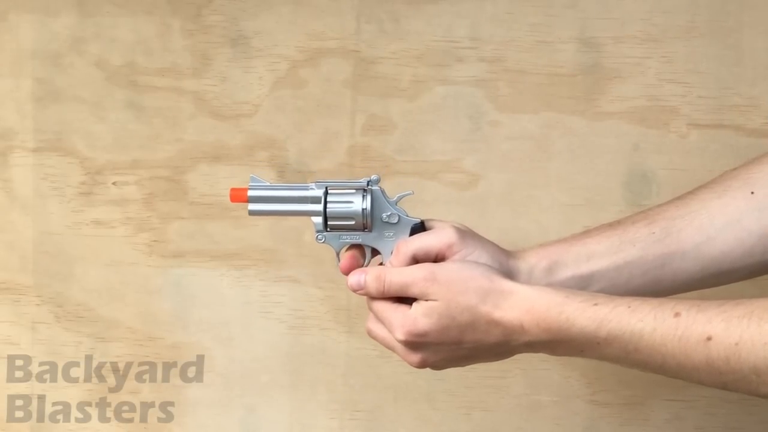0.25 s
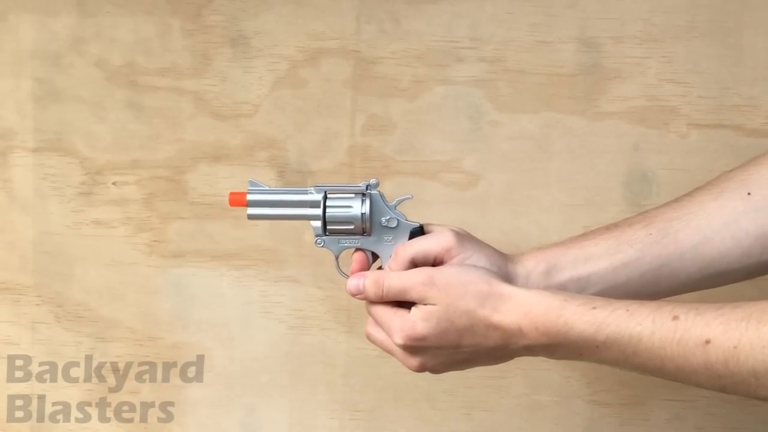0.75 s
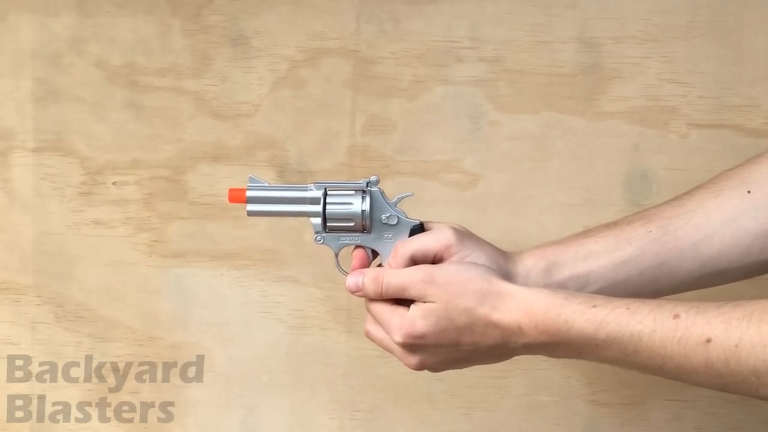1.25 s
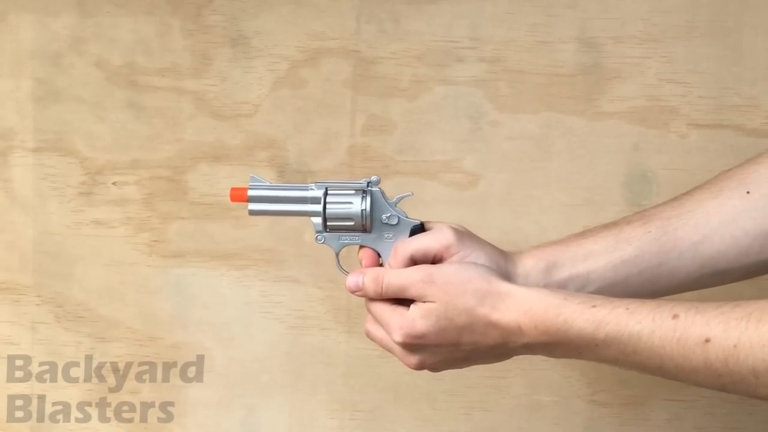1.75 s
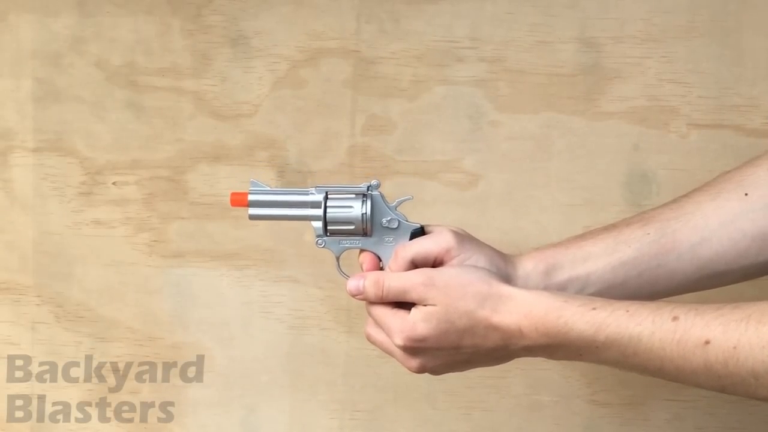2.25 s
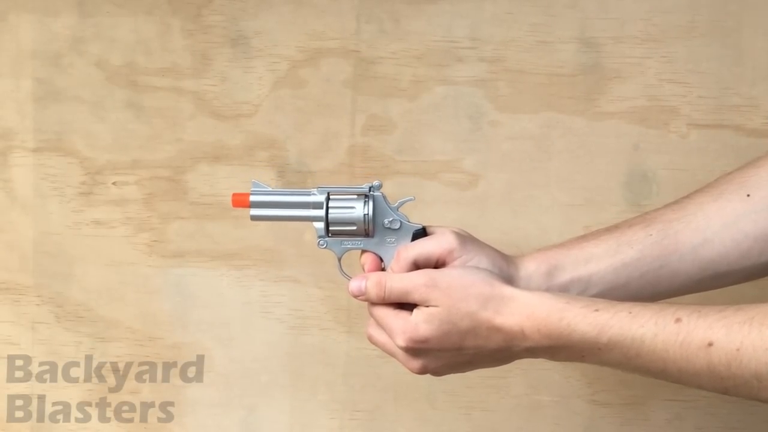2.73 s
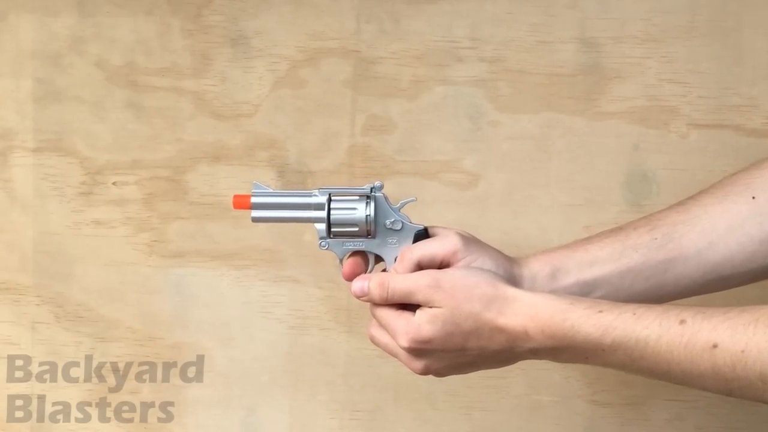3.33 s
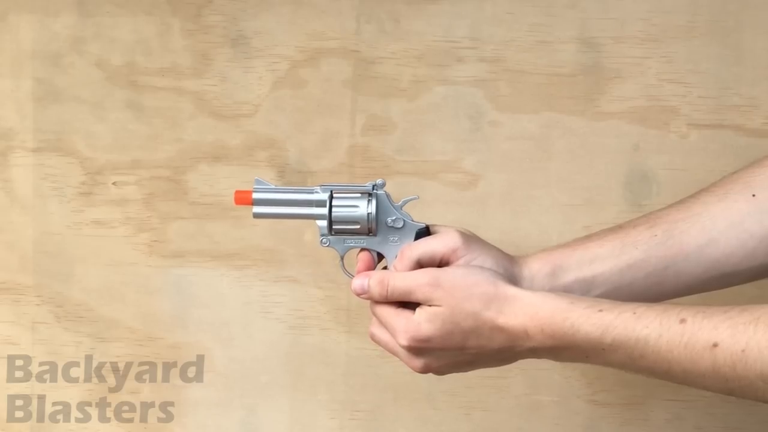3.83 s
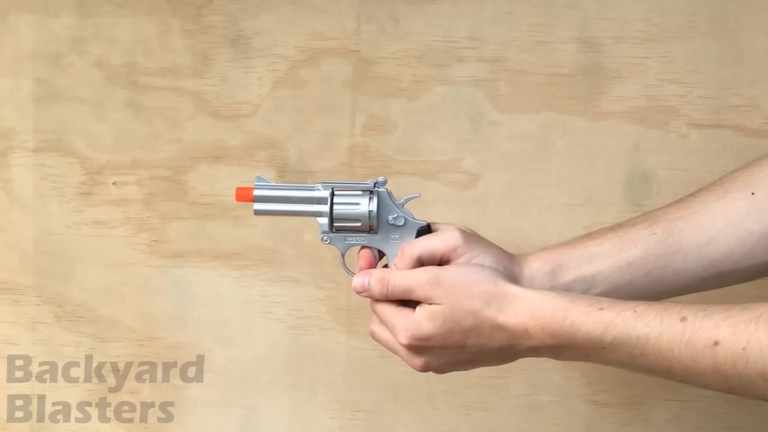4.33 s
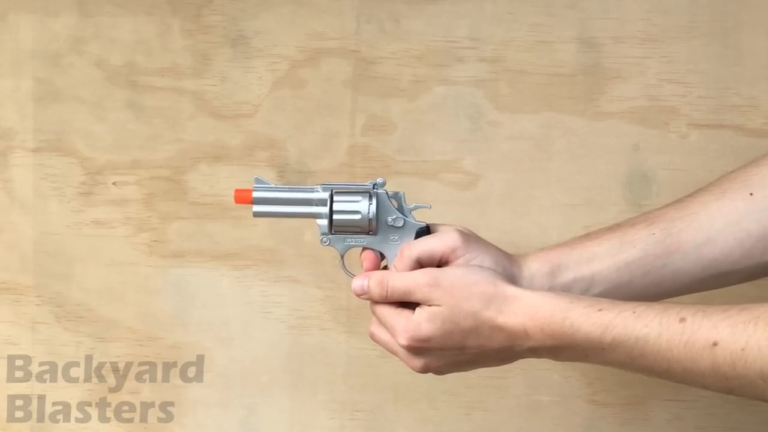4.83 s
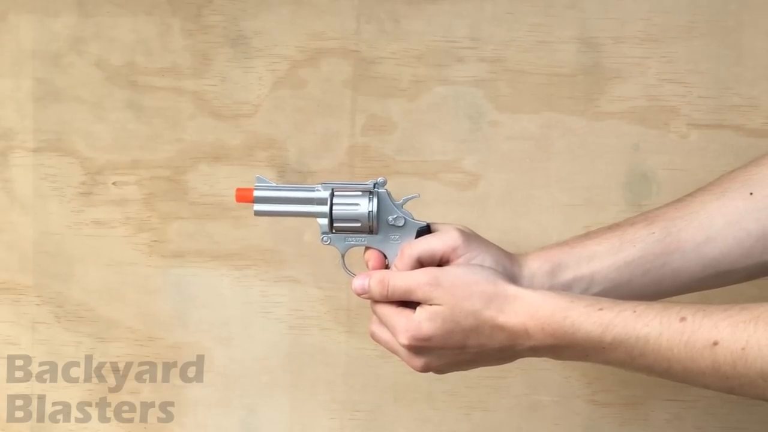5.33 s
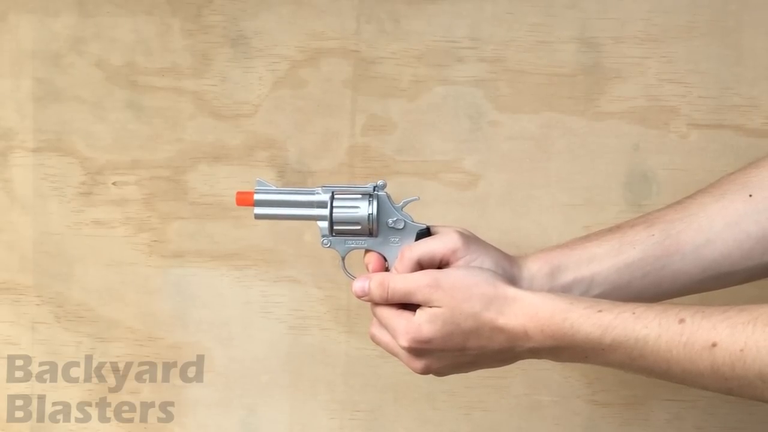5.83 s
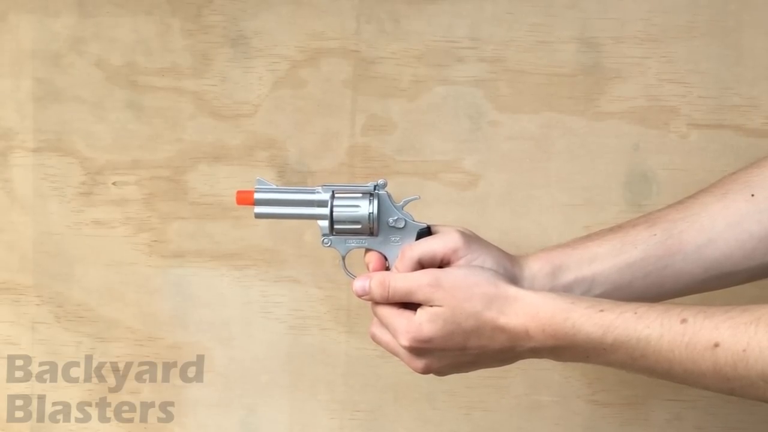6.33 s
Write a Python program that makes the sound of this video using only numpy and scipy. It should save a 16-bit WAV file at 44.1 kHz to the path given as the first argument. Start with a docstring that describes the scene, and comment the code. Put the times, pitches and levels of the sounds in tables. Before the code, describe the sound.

Close by in a quiet yard, a metal toy revolver clicks and lightly rattles as its lock works, then fires a loud, bright cap bang with a short thump. Reflections and soft hiss follow. After a pause, more clicks lead to a second similar bang. A low motor hum, faint birds and a brief distant hoarse drone lie behind, ducking under each shot.

```python
"""Toy revolver in a quiet yard

A toy revolver is cocked and fired twice, close by. Its lock clicks and rattles: short metal scrapes that leave
the frame ringing. Each cap flares, then cracks, thumps and blasts: shaped noise and a sagging low tone,
followed by reflections. A soft hiss grows after each shot and stops short. Behind it a far motor hums in steady
tones, and birds and a hoarse drone call faintly; this background sinks under each bang."""
import sys
import numpy as np
from scipy import signal
from scipy.fft import rfft, irfft
from scipy.io import wavfile

SR = 44100
rng = np.random.default_rng(int(sys.argv[2]) if len(sys.argv) > 2 else 0)


def dump_mix(stems):
    """Bounce the given channels to the path in sys.argv[1] as a 16-bit WAV at rate SR."""
    frames = np.atleast_2d(stems).T  # one column per channel
    limited = np.clip(frames, -1, 1)  # hard clip at full scale
    pcm = np.round(limited * 32767).astype(np.int16)
    wavfile.write(sys.argv[1], SR, pcm)


N = 289737  # length in samples

# colour of the blast, also used for the hammer blow and the shock fronts: f/Hz, relative level/dB
BLAST_COLOUR = [(100, -12.5), (350, -9), (1100, -2), (2000, 1.5), (3300, -0.5), (4300, -7.5), (5200, -7.5),
                (6500, -7.5), (8700, -1), (12000, -6), (16000, -11.5)]
FLARE_S = 0.0192  # from hammer fall to crack
WHISTLE_ROUGH = 0.016  # pitch scatter of the birds' whistles, as a share


def amp(db):
    """Turns decibels into a plain factor."""
    return 10 ** (np.asarray(db) / 20)


def evened(x):
    """Scales to rms 1."""
    return x / np.sqrt(np.mean(x ** 2) + 1e-20)


def read(points, hz):
    """Joins the points by straight lines on a log-frequency axis."""
    f, value = np.transpose(points)
    return np.interp(np.log(hz + 1), np.log(f + 1), value)


def add(mix, s, sound):
    """Adds a sound into the mix from s seconds on, cut at the end of the mix."""
    part = mix[max(round(s * SR), 0):][:len(sound)]
    part += sound[:len(part)]


def noise(colour, size):
    """Noise of the given colour, rms 1."""
    spectrum = rfft(rng.standard_normal(size))
    gain = amp(read(colour, np.fft.rfftfreq(size, 1 / SR)))
    return evened(irfft(spectrum * gain, size))


def waver(hz, size):
    """Slow chance movement up to about the given rate, rms 1 over the whole scene."""
    return noise([(hz, 0), (hz * 2, -30), (hz * 10, -120)], N)[:size]


def coloured(x, colour, size=1024):
    """Causal filter of energy 1: nothing sounds ahead of a click."""
    log_gain = np.log(amp(read(colour, abs(np.fft.fftfreq(size, 1 / SR)))))
    # minimum phase packs the energy as early as possible
    taps = np.fft.ifft(np.exp(np.conj(signal.hilbert(log_gain)))).real
    return signal.fftconvolve(x, taps / np.linalg.norm(taps))[:len(x)]


def dying(x, t60s):
    """Lets each band die at its own speed; t60 is the time to fall by 60 dB."""
    hz, t, bands = signal.stft(x, SR, nperseg=256)
    fade = amp(-60 * t / read(t60s, hz)[:, None])
    return signal.istft(bands * fade, SR, nperseg=256)[1][:len(x)]


def rise(t, start, length):
    """Smooth step from 0 to 1."""
    return np.sin(np.pi / 2 * np.clip((t - start) / length, 0, 1)) ** 2


def background(air_db=-58, rumble_db=-50, chorus_db=-73):
    """Wavering motor hum in its rumble, open air, and a thin far chorus of birds."""
    # steady tones of the far motor: f/Hz, rms level/dB
    hum_tones = [(48.8, -58), (73.6, -49.5), (97.8, -56), (147, -71.5)]
    # low noise around the hum: f/Hz, relative level/dB
    rumble_colour = [(15, -36), (32, -16.5), (47, 10.5), (70, 2), (95, 0.5), (130, -2.5), (200, -18.5),
                     (400, -42.5)]
    # open air: f/Hz, relative level/dB
    air_colour = [(60, -10), (160, 2.5), (300, -5), (900, -10), (2000, -16.5), (3800, -24), (5000, -25.5),
                  (8500, -26), (11000, -33), (16000, -33.5)]
    chorus_colour = [(2300, -19), (3100, 1), (3600, 0), (4000, 2.5), (4400, -7.0), (5500, -40)]

    drift = 1 + 0.0068 * waver(2.6, N)  # all tones drift together
    hum = np.zeros(N)
    for hz, db in hum_tones:
        turns = np.cumsum(hz * drift) / SR + rng.random()
        hum += amp(db + 0.5 * waver(11.0, N)) * np.sqrt(2) * np.sin(2 * np.pi * turns)
    rumble = amp(rumble_db) * noise(rumble_colour, N)
    air = amp(air_db + 0.5 * waver(2.0, N)) * noise(air_colour, N)
    chorus = amp(chorus_db + 2 * waver(14, N)) * noise(chorus_colour, N)
    return hum + rumble + air + chorus


def note(length, from_hz, to_hz, rough, flutter_db=4):
    """One gliding bird note: a sine whose pitch and level flutter by chance."""
    size = int(length * SR)
    hz = np.linspace(from_hz, to_hz, size) * (1 + rough * waver(300, size))
    level = amp(flutter_db * waver(45, size)) * signal.windows.tukey(size, 0.5)
    return level * np.sqrt(2) * np.sin(2 * np.pi * np.cumsum(hz) / SR)


def birds(count=8):
    """Runs of rising chirps, a few whistles, and fainter ones at random times."""
    # one bird repeats a rising chirp: start t/s, length of the run/s, chirp spacing/s, level/dB
    chirp_runs = [(0.112, .5, .136, -60.5), (1.115, .7, .127, -70.5)]
    # other birds' thin, level or falling whistles: t/s, length/s, start f/Hz, end f/Hz, level/dB
    whistles = [(.765, 0.048, 5170, 5100, -70), (3.89, 0.31, 3110, 3080, -72),
                (4.043, .041, 4410, 3460, -72), (4.146, 0.11, 3680, 3300, -67.5),
                (4.634, 0.326, 4070, 4020, -83), (6.203, .2, 3730, 3710, -76.5),
                (6.335, 0.18, 4080, 4050, -68.5)]
    chirp_s, chirp_from_hz, chirp_to_hz, chirp_rough = 0.038, 1900, 2900, 0.057
    faint_s, faint_hz, faint_spread, faint_db = 0.1, 3920, 0.05, -72

    out = np.zeros(N)
    for start, length, spacing, db in chirp_runs:
        for s in np.arange(start, start + length, spacing):
            add(out, s, amp(db) * note(chirp_s, chirp_from_hz, chirp_to_hz, chirp_rough))
    for s, length, from_hz, to_hz, db in whistles:
        add(out, s, amp(db) * note(length, from_hz, to_hz, WHISTLE_ROUGH))
    for when, pitch in rng.random((count, 2)):
        hz = faint_hz * (1 + faint_spread * (2 * pitch - 1))
        add(out, when * N / SR, amp(faint_db) * note(faint_s, hz, hz, WHISTLE_ROUGH))
    return out


def drone():
    """A far, hoarse drone swells and fades: four overtones on one rough, gliding pitch."""
    # its path: t/s, pitch f/Hz, level/dB
    path = [(.9, 488, -75), (1.1, 490.4, -64), (1.299, 518.2, -61.5), (1.549, 557.5, -64.5),
            (1.751, 549, -66.5)]
    t = np.arange(N) / SR
    s, hz, db = np.transpose(path)
    turns = np.cumsum(np.interp(t, s, hz) * (1 + 0.07 * waver(90, N))) / SR
    voice = sum(np.sin(2 * np.pi * k * turns) / k ** 0.79 for k in range(1, 5))
    return amp(np.interp(t, s, db, -120, -120)) * evened(voice)


def distant_calls(wet=0.66):
    """Birds and drone, smeared by distance: a fading noise tail blurs each call."""
    calls = birds() + drone()
    t = np.arange(SR // 2) / SR
    tail = rng.standard_normal(len(t)) * amp(-60 * t / 0.3)
    return calls + wet * signal.fftconvolve(calls, tail / np.linalg.norm(tail))[:N]


def yard(x, near_db=-12, far_db=-15.5):
    """A wall and the hands scatter sound almost at once; the yard adds a thin tail."""
    # how fast the tail dies: f/Hz, t60/s
    tail_t60 = [(1000, 0.29), (4000, .24), (15000, 0.18)]
    t = np.arange(SR // 2) / SR
    near = rng.standard_normal(len(t)) * rise(t, 0.0028, 0.0022) * amp(-60 * t / 0.027)
    far = dying(rng.standard_normal(len(t)), tail_t60) * rise(t, 0.00604, 0.005)
    taps = amp(near_db) * near / np.linalg.norm(near) + amp(far_db) * far / np.linalg.norm(far)
    return x + signal.fftconvolve(x, taps)[:N]


def click(db, low_db, high_db, part_hz, ring_db, scrape=0.0026, part_db=3):
    """A very short metal scrape, coloured by the part struck, that leaves the frame ringing."""
    # ringing tones of the metal frame: f/Hz, level/dB, t60/s
    frame_modes = [(2770, -4.5, 0.034), (4020, -12.5, .05), (4480, -12.5, 0.027), (6510, -5.5, 0.065),
                   (8400, -3.5, 0.12), (9500, -12, 0.065), (14900, -1.5, 0.042)]
    # common colour of the lock's clicks: f/Hz, relative level/dB
    lock_colour = [(300, -62.5), (950, -26.5), (1330, -3.5), (1750, -12), (2600, 1), (4500, -0.5),
                   (8200, -1.5), (10000, -7), (12000, -5.5), (14800, -6), (16500, -3.5)]

    t = np.arange(SR // 8) / SR
    release = np.exp(-np.maximum(t - scrape, 0) / 0.0009)
    contact = rng.standard_normal(len(t)) * rise(t, 0, 0.00022) * release

    hz = np.geomspace(200, 17000, 120)
    lean_db = read([(2800, low_db), (4600, 0.014), (9500, 0), (12500, high_db)], hz)
    peak_db = part_db * np.exp(-(np.log(hz / part_hz) / 0.15) ** 2)
    strike = coloured(contact, np.column_stack([hz, read(lock_colour, hz) + lean_db + peak_db]))

    # the loose parts split each mode into a close cluster of four, new at every blow
    splits = 1 + 0.025 * rng.standard_normal((len(frame_modes), 4, 1))
    ring = np.zeros(len(t))
    for (f, mode_db, t60), split in zip(frame_modes, splits):
        ring += amp(mode_db - 60 * t / t60) * np.sin(2 * np.pi * f * split * t).sum(0)

    sound = evened(strike) + amp(ring_db) * evened(ring * rise(t, 0, 0.0018))
    return amp(db) * sound / np.std(sound[:SR // 200])  # level over the first 5 ms


def lock_work(count=7):
    """Firm clicks of the lock, and rattles of the turning cylinder: light, uneven, fading ticks."""
    # sharp clicks of trigger, pawl and hammer:
    # t/s, level/dB, extra lows/dB, extra highs/dB, pitch of the struck part f/Hz, frame ring/dB
    clicks = [(0.24, -48, 18, -12, 3400, -29), (0.3425, -41, -12, 0, 8300, -6),
              (0.362, -37, 1, -2, 7400, -19), (0.573, -39.5, 1, -1, 6000, -15),
              (0.6047, -37, 1.5, -2, 2940, -29), (1.6558, -37.5, 3.5, -6, 2720, -30),
              (1.8079, -36.5, 5, 1, 6500, -17), (1.831, -25, -5.5, -3, 5700, -28),
              (1.85, -35, -21, 1, 11600, -7), (1.862, -32, -2.5, -0.5, 5930, -6),
              (3.312, -50.5, 11, -12, 2400, -24), (3.36, -33, 2, -14, 4040, -4),
              (3.4424, -24, 2, -8, 2230, -29), (3.5428, -39, -8, -11, 5630, -24),
              (3.556, -44, 12, -3, 3240, -24), (3.571, -39.5, -1.5, -9, 8200, -26),
              (4.561, -36, 8.5, 3, 2620, -24.5), (4.971, -33, 9.5, 3.5, 2650, -21.5),
              (4.9785, -26, -15, 1.5, 8500, -17.5), (5.0085, -30.5, 0.5, 7.5, 6540, -14),
              (5.013, -36.5, -8, -1.5, 6500, -16), (5.336, -34.5, 0, -3, 6460, -25),
              (5.343, -32.5, 0.5, 2, 6200, -23)]
    # the loose cylinder rattles as it turns:
    # start t/s, length/s, level/dB, extra lows/dB, extra highs/dB, pitch of the struck part f/Hz
    rattles = [(0.337, .039, -43.5, 4, -5, 14700), (0.595, .03, -47.5, 8, -15, 2600),
               (1.834, .039, -40.5, 4.5, 1, 1500), (3.367, .029, -42, 4, -1, 14500),
               (4.986, .017, -41.5, 16.5, 0, 1400)]
    tick_gap_s, tick_scatter = 0.0065, 0.22  # spacing of the ticks, and its chance share
    fade_db_per_s, tick_spread_db, tick_ring_db = 70, -1.5, -9

    out = np.zeros(N)
    for s, *blow in clicks:
        add(out, s, click(*blow))
    for s, length, db, *colour in rattles:
        for k, (late, force) in enumerate(rng.standard_normal((count, 2))):
            after = tick_gap_s * (k + tick_scatter * late)
            tick_db = db + tick_spread_db * force - fade_db_per_s * after
            tick = click(tick_db, *colour, tick_ring_db)
            add(out, s + after, tick * (after < length))  # ticks past the end are silent
    return out


def flare(hollow_hz, whistle_hz, whistle_db, upper_hz=3170, upper_db=-2, hollow_db=-2,
          scatter=0.017, hammer_db=-8):
    """The hammer lands, the cap catches: a dull rush, a hollow note, two whistles of escaping gas."""
    # colour of the rush: f/Hz, relative level/dB
    rush_colour = [(60, -2.5), (250, -11), (410, -0.5), (650, -5), (1000, -12.5), (1200, -14.5),
                   (1900, -14), (3300, -19.5), (3900, -32.5), (9000, -38), (16000, -42.5)]
    t = np.arange(SR // 10) / SR
    swell = rise(t, 0, 0.00051) * (0.9 + 0.3 * rise(t, 0, 0.028))
    swell *= 1 - rise(t, FLARE_S, 0.0042)  # the flare ends as the crack begins
    notes = np.zeros(len(t))
    for hz, db in [(whistle_hz, whistle_db), (upper_hz, upper_db), (hollow_hz, hollow_db)]:
        turns = np.cumsum(hz * (1 + scatter * waver(220, len(t)))) / SR
        notes += amp(db) * np.sin(2 * np.pi * turns)
    hammer = amp(hammer_db - 60 * t / 0.054) * noise(BLAST_COLOUR, len(t)) * rise(t, 0, 0.00072)
    rush = 0.83 * noise(rush_colour, len(t))
    return hammer + swell * (rush + notes * rise(t, 0.0024, 0.0096))


def bang(blast_db, thump_hz, glide, crack_db=-13, front_db=-15, thump_db=-8, settle_hz=40):
    """Crack with steep shock fronts, sagging pressure thump and bright blast."""
    # colour of the crack: f/Hz, relative level/dB
    crack_colour = [(60, -15.5), (150, -15), (260, -3.5), (400, -4.5), (560, 1), (760, -6), (980, 9.5),
                    (1180, -3.5), (1450, -4.5), (1750, -19.5), (3300, -11), (4100, -24), (6000, -9),
                    (16000, -39)]
    t = np.arange(SR) / SR
    crack = amp(crack_db) * noise(crack_colour, SR) * rise(t, 0, 0.0028)
    crack *= amp(-60 * np.maximum(t - 0.004, 0) / 0.038)
    fronts = sum((t >= s) * np.exp(-abs(t - s) / 0.0011) for s in (0.0002, 0.0026, 0.0078))
    crack += amp(front_db) * fronts * noise(BLAST_COLOUR, SR)

    late = np.maximum(t - 0.0062, 0)  # the thump starts a little after the crack
    hz = settle_hz + (thump_hz - settle_hz) * np.exp(-late / glide)
    turns = np.cumsum(hz * (late > 0)) / SR
    thump = -amp(thump_db) * np.sin(2 * np.pi * turns)
    thump *= amp(-60 * late / 0.088) * rise(late, 0, 0.0019)

    # small shocks, about 900 a second, make the blast crackle
    shocks = evened(rng.standard_normal(SR) * (rng.random(SR) < 900 / SR))
    blast = coloured(0.92 * rng.standard_normal(SR) + 0.68 * shocks, BLAST_COLOUR)
    blast *= amp(blast_db) * rise(t, 0, 0.017) * amp(-60 * np.maximum(t - 0.022, 0) / 0.17)
    return crack + thump + blast


def reflections(body_db=-9.5, echo_db=-42, between_db=-41):
    """The surroundings throw the bang back: near scatter, then a far, grainy echo."""
    # colour of the near scatter: f/Hz, relative level/dB
    body_colour = [(60, -38), (250, -16.5), (550, -1), (950, 2), (1500, -1.5), (2500, 0), (3500, -3),
                   (5000, -12.5), (6800, -7), (8700, -4), (11000, -9), (16000, -16)]
    # how fast the near scatter dies: f/Hz, t60/s
    body_t60 = [(100, 0.25), (500, 0.27), (2500, 0.33), (8000, 0.3), (15000, 0.29)]
    # colour of the far echo: f/Hz, relative level/dB
    echo_colour = [(100, -6), (300, -16.5), (800, 1), (1900, 3.5), (3400, -0.5), (4200, -8), (6500, -8.5),
                   (8700, -7.5), (11500, -17), (16000, -26.5)]
    t = np.arange(SR) / SR
    body = amp(body_db) * dying(noise(body_colour, SR), body_t60) * rise(t, 0.0095, 0.078)
    between = amp(between_db - 60 * t / 1.64) * noise(echo_colour, SR) * rise(t, 0.013, 0.032)
    grainy_db = echo_db + 0.84 * waver(52, SR) - 60 * np.maximum(t - 0.27, 0) / 0.64
    echo = amp(grainy_db) * noise(echo_colour, SR) * rise(t, 0.18, 0.058)
    return body + between + echo


def hiss(t, s, length, full_db=-47, start_db=-72.5, grow_s=0.5):
    """A soft hiss grows towards its full level as the bang dies, then stops short."""
    # colour of the hiss: f/Hz, relative level/dB
    hiss_colour = [(100, 10), (500, 2.5), (1500, -1), (4000, -6), (9000, -10.5), (16000, -15)]
    since = np.maximum(t - s, 0)
    lasts = rise(t, s, 0.0099) - rise(t, s + length - 0.008, 0.01)
    level_db = full_db + (start_db - full_db) * np.exp(-since / grow_s)
    return amp(level_db) * noise(hiss_colour, N) * lasts


def sinking(t, s, back_s, sink_db=-20.5, fall_s=0.044, curve=2.6):
    """Background level in dB: it sinks under a bang, then creeps back ever faster."""
    since = np.maximum(t - s, 0)
    return sink_db * rise(t, s, fall_s) * (1 - np.minimum(since / back_s, 1) ** curve)


def scene():
    """Lock work and two shots over the sinking background."""
    # the shots: t of the crack/s, flare/dB, flare's hollow note f/Hz, its lower whistle f/Hz,
    # whistle/dB, blast/dB, reflections/dB, thump start f/Hz, thump glide time/s, hiss length/s,
    # time until the background is back/s
    shots = [(1.9004, -17, 420, 2710, -9.5, -16.5, -2, 137, 0.012, .612, .68),
             (5.3665, -19, 277, 2593, 3.5, -16, 0, 87.5, 0.0108, .772, 0.6)]
    t = np.arange(N) / SR
    gun = yard(lock_work())
    answer = reflections()  # the gun stays put, so both shots ring with the same pattern
    sink_db = np.zeros(N)
    for (s, flare_db, hollow_hz, whistle_hz, whistle_db, blast_db, answer_db,
         thump_hz, glide, hiss_length, back_s) in shots:
        add(gun, s - FLARE_S, amp(flare_db) * flare(hollow_hz, whistle_hz, whistle_db))
        add(gun, s, bang(blast_db, thump_hz, glide) + amp(answer_db) * answer)
        gun += hiss(t, s, hiss_length)
        sink_db += sinking(t, s, back_s)
    return (gun + amp(sink_db) * (background() + distant_calls()))[None]


def record(dry, ceiling=0.77, edge_hz=16100):
    """Rounds off the loudest peaks, then removes everything above the band edge."""
    rounded = dry / (1 + (dry / ceiling) ** 6) ** (1 / 6)
    low_pass = signal.firwin(511, edge_hz, window=("kaiser", 9), fs=SR)
    return signal.oaconvolve(rounded, low_pass[None], "same")


dry = scene()
out = record(dry)
dump_mix(out)
```